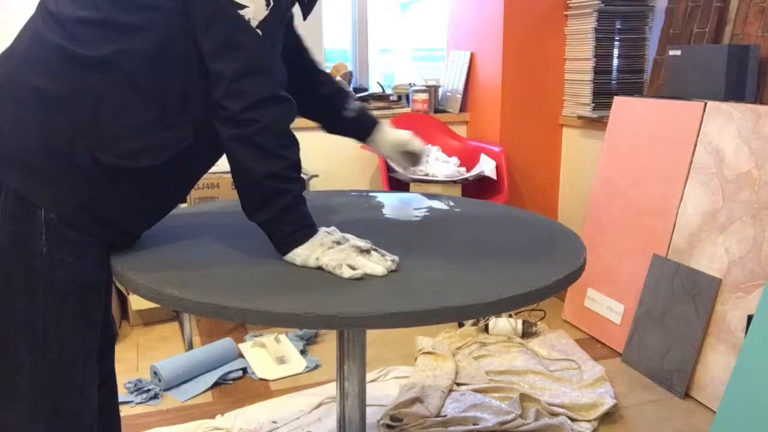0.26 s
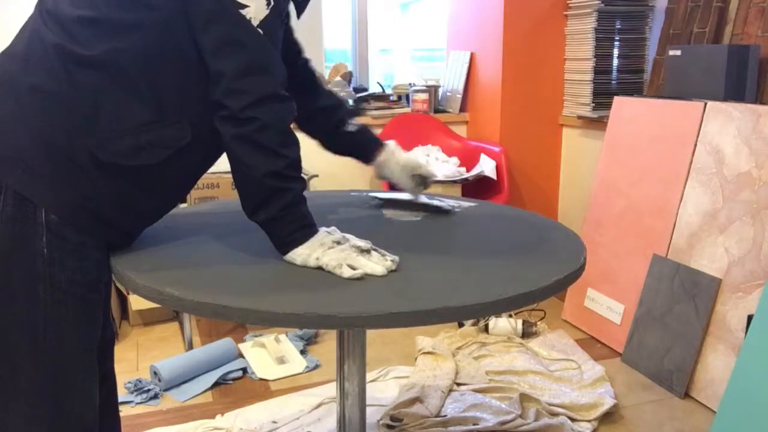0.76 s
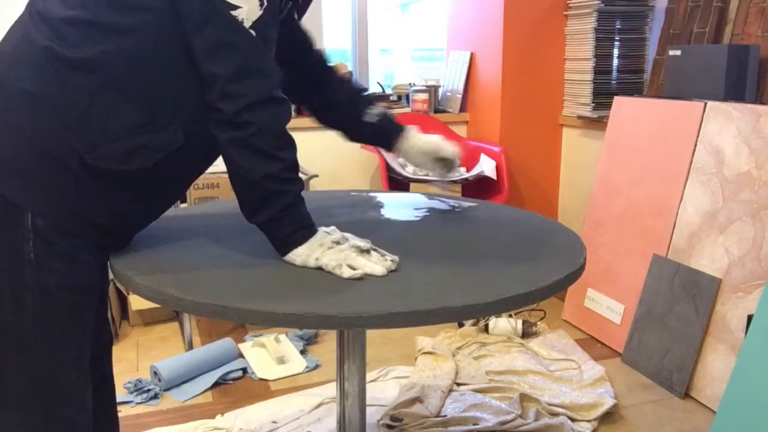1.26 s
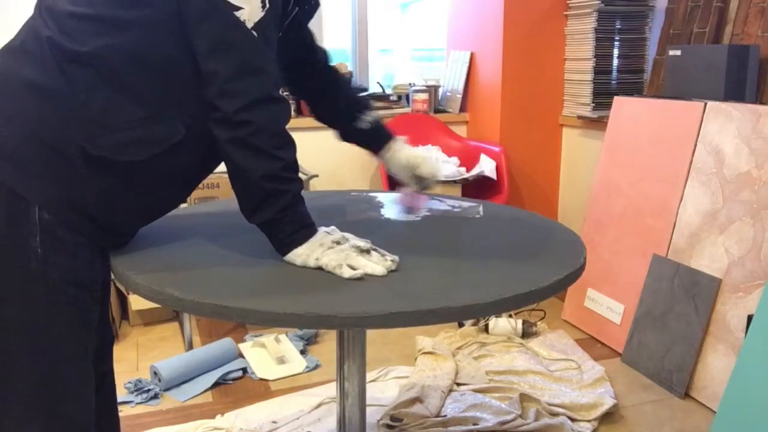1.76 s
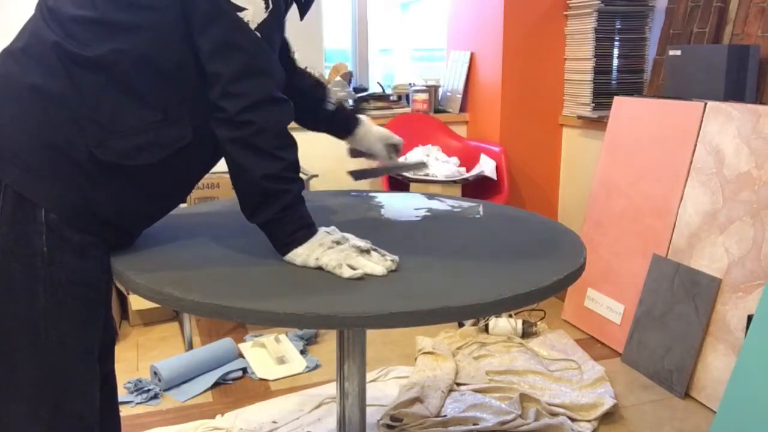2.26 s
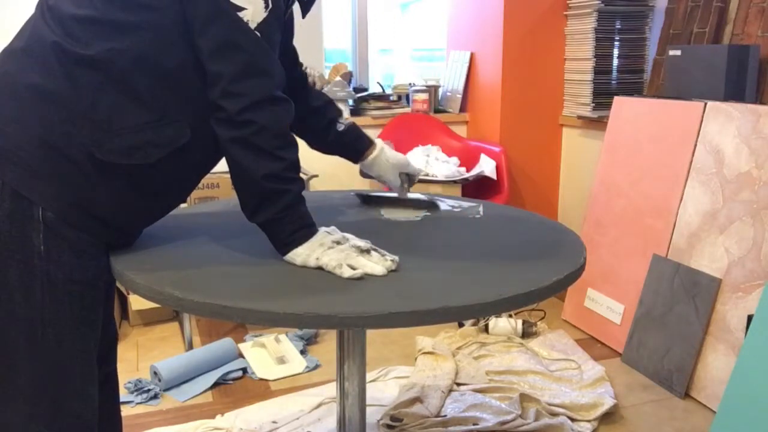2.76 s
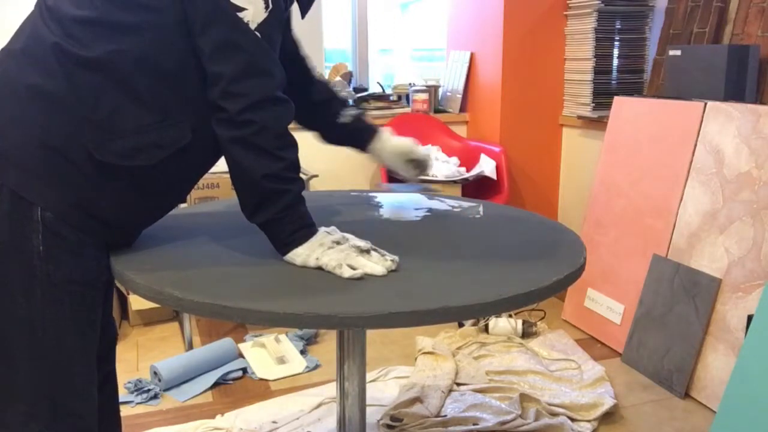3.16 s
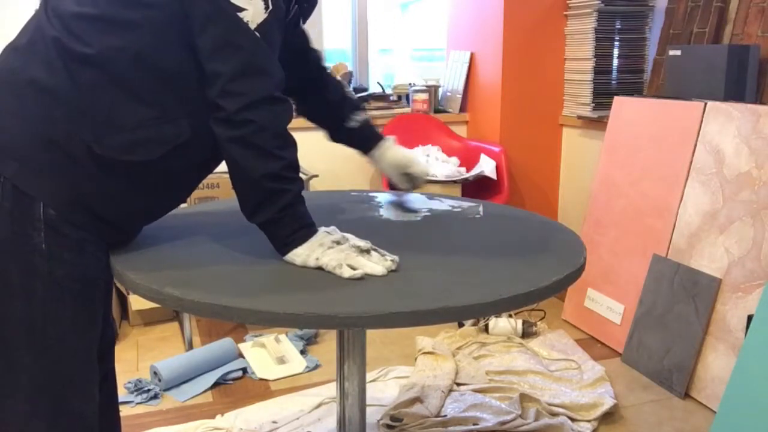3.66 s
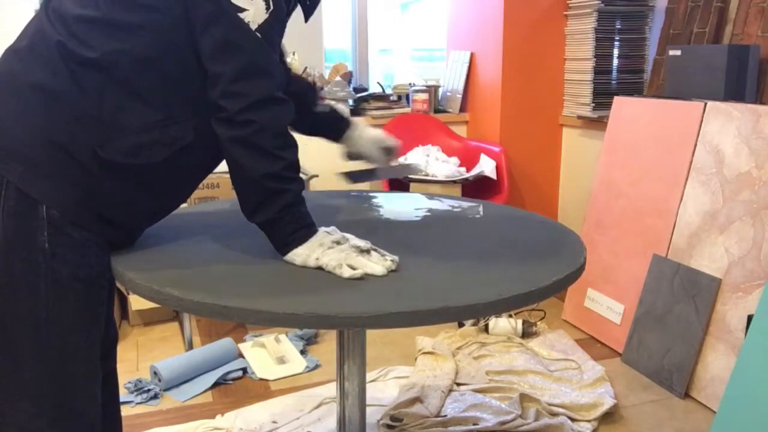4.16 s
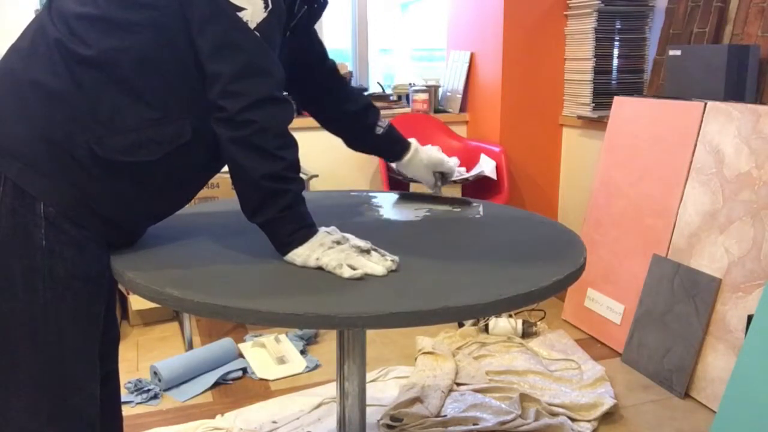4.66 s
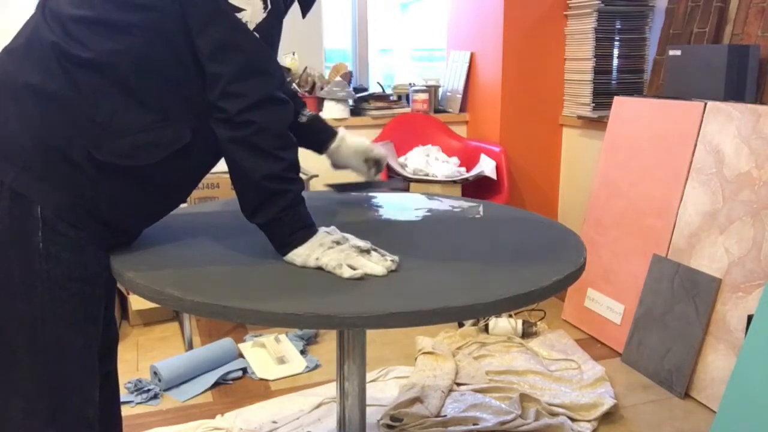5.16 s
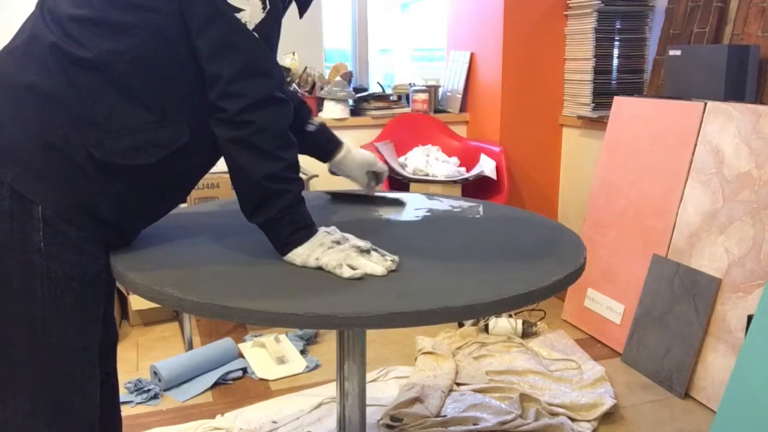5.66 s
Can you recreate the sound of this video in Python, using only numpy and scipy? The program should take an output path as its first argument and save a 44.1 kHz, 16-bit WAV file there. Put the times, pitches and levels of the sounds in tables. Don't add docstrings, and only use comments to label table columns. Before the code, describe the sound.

After a sliver of silence, the end of a gritty metal scrape is heard and cuts off by about 0.15 s. A steel blade then strokes a rough hard tabletop about once a second, landing near 0.6, 1.6, 2.6, 3.5, 4.5 and 5.5 s. Each landing is a quick clatter of corner clicks and short skids, heaviest in the last two strokes. A dense, bright rasp follows for about half a second, swelling unevenly, with a bending metallic resonance and a hollow low boom from the table. It lifts off abruptly. In the gaps a thin ring lingers, clearest around 1.2 s and steady around 2.3 to 2.5 s, with a short room tail, faint hiss and low hum. Soft puffs of moved air accompany several strokes, and a foot shifts very faintly near 1.4 s. The last scrape is cut off mid-stroke, near 5.9 s.

```python
import sys
import numpy as np
from scipy import signal
from scipy.fft import rfft, irfft
from scipy.io import wavfile

SR = 44100
rng = np.random.default_rng(int(sys.argv[2]) if len(sys.argv) > 2 else 0)


def level_to_linear(level):
    exponent = np.asarray(level, float) / 20
    return 10 ** exponent


def output_pcm(signal):
    pcm = np.clip(np.atleast_2d(signal).T, -1, 1) * 32767
    wavfile.write(sys.argv[1], SR, np.round(pcm).astype(np.int16))


N = 259749

# frequency in Hz, level in dB per Hz.
FLOOR_COLOUR = [(19, -36.5), (32, -13.5), (133, -13), (255, -23), (290, -24.5), (615, -28), (700, -30),
                (907, -30.5), (1370, -28), (1480, -28), (1600, -28.5), (6020, -36.5), (15700, -53)]
# frequency in Hz, level in dB rms.
HUM = [(44.5, -76.5), (119, -69), (238, -97)]
# time in seconds, level in dB.
HISS_AFTER = [(.25, -57.5), (1.3, -57.5), (2.3, -59), (3.3, -60), (4.2, -59), (5.3, -61)]
GATES = [.497, 2.497, 4.432, 5.461]
HISS_SAG_DB_PER_S, GATE_DB = 14.5, -4.5

# frequency in Hz, t60 in seconds.
ROOM_DECAY = [(300, 0.71), (1000, 0.4), (3000, 0.4), (6000, 0.36), (10000, 0.32), (15000, 0.2)]
ROOM_DB = -7.5

# time in seconds, peak in dB, pitch in Hz, length in seconds.
PUFFS = [(.72, -56.5, 42, .12), (1.677, -51, 43, 0.12), (2.655, -50, 45.3, 0.12), (3.603, -59, 43, 0.16),
         (3.929, -60, 43.4, .14), (.67, -55, 150, 0.087), (2.62, -51.5, 152.5, 0.08)]
# time in seconds, peak in dB, pitch in Hz, length in seconds.
STEPS = [
    (1.36, -56, 500, 0.036),
    (1.374, -61, 327, 0.041),
]

# lift in seconds, landing in seconds, level in dB rms,
# t60 in seconds, lower mode in dB relative to the upper.
RINGS = [
    (.15, 0.612, -71, 2.2, -1),
    (1.137, 1.575, -51, 0.71, -25),
    (2.263, 2.574, -54.5, 8.2, -28),
    (3.141, 3.495, -80, 3, -17),
    (4.23, 4.543, -61, 1.05, -11),
    (5.22, 5.493, -61, 2.1, -22),
]
RING_HZ = 1464, 834
RING_DB = 5.5

# frequency in Hz, width in Hz, level in dB.
TABLETOP = [(315, 23.6, -1), (342, 17, 3.5), (363, 15, -5), (384, 9.2, -6.5), (498, 48, -5), (562, 21, -2),
            (664, 31, -5), (724, 33, -4.5)]
# time in seconds, level in dB, favoured pitch in Hz.
HOLLOWS = [(.1, 12, 333), (.66, 1, 340), (.96, 13, 335), (1.2, -8, 340), (1.69, 4.5, 330), (1.8, 2, 334),
           (1.95, 2.5, 345), (2.11, 5, 330), (2.63, 7, 330), (2.78, -3, 340), (2.95, 8.5, 340),
           (3.22, -9, 336), (3.68, 8.5, 320), (3.8, 0.5, 350), (3.93, -8.5, 320), (4.07, 11.5, 345),
           (4.57, 10, 315), (4.72, 6, 328), (4.84, -7, 320), (4.9, 7, 360), (5.03, 8, 367), (5.17, 14, 374),
           (5.62, 6.5, 310), (5.82, 11, 376)]
HOLLOW_S, HOLLOW_WIDTH_HZ = 0.07, 48
BOOM_DB, BOOM_FOLLOWS, BOOM_LIFT_DB_PER_S = -33, 0.37, 59

# frequency in Hz, level in dB per Hz.
SCRAPE_COLOUR = [(250, -65), (420, -30), (725, -15.5), (810, -18.5), (1090, -8), (1550, -8), (2500, -7.5),
                 (4600, -7.5), (4950, -14), (5500, -10.5), (9300, -20), (10400, -24.5), (11200, -22),
                 (16500, -23.5)]
# frequency in Hz, width in Hz, gain in dB over the colour.
BLADE = [(912.5, 44, 8.5), (1302, 244, 6), (1519, 44, 3.5), (1659, 30, 5.5), (1860, 130, 4.5),
         (2153, 250, 5), (2695, 410, 3.5), (3120, 180, 5.5), (3840, 160, 2), (4570, 200, 1),
         (6125, 410, -1), (6000, 490, 4), (9330, 510, 1.5)]
# frequency in Hz, width in Hz, level in dB.
LINGER = [(1003, 6.7, -1.5), (1277, 13, -4), (1498, 3.7, -2), (1611, 11, -3), (2306, 8.8, -4),
          (2774, 16, -5.5), (3236, 9.3, -10.5)]
# Hz at landing, Hz at lift, dB at landing, dB at lift.
BEND = [(1420, 1430, -11.5, 0), (1655, 1700, 6, 0.5), (1760, 1620, -5, -1), (1463, 1716, 3.5, -3),
        (1675, 1530, 4.5, -1), (1640, 1685, -1.5, 3), (1640, 1580, 4.5, 1)]
# time in seconds, frequency in Hz, level in dB.
UNBEND = [(.1, 3130, 3), (1.62, 2800, 5), (2.85, 6220, 4.5), (4.8, 6130, 4), (1.11, 2300, 11.5),
          (3.05, 2360, 3), (3.07, 2910, 2), (4.05, 2950, 5), (5.09, 2900, 8.5)]
UNBEND_S, UNBEND_WIDTH_HZ = 0.051, 160
FLEX_DB, FLEX_WIDTH_HZ, WANDER_DB = 4.5, 202, 3.5

# time in seconds, peak in dB, top in dB relative, skid t60 in seconds.
LANDINGS = [(0.6154, -25, -13, 0.045), (0.6251, -21, -2, 0.017), (.6325, -21, -4, 0.0089),
            (.654, -20.5, -15, 0.044), (1.574, -37, -28, 0.079), (1.597, -23, -7, 0.083),
            (2.5694, -21, -4, 0.023), (2.575, -22, -5, .015), (2.581, -27, -18, 0.018),
            (3.4894, -31.5, -9.5, 0.084), (3.5224, -20.5, -1, 0.026), (4.541, -25.5, -20, 0.075),
            (4.6114, -15, -8, 0.038), (4.660, -12.5, -0.5, 0.016), (5.495, -31, -3, .06),
            (5.51, -24, -2, 0.014), (5.544, -17, -18, 0.015), (5.586, -20, -5, .008),
            (5.602, -14.5, -3, 0.013), (5.634, -19, 10, .008)]
# frequency in Hz, width in Hz, level in dB.
THUD = [(500, 55, -17.5), (594, 88, -19.5), (730, 57, -16.5)]

# time in seconds, level in dB.
PRESSURE = [
    [(0, -6.5), (.085, -23.5), (.125, -29)],
    [(.616, -36.5), (.63, -29.5), (.646, -49), (.66, -27), (.72, -24), (.95, -17), (1.06, -20), (1.11, -31)],
    [(1.575, -63), (1.607, -33.5), (1.645, -35.5), (1.693, -23), (1.77, -20.5), (1.92, -21.5), (1.99, -16),
     (2.095, -20)],
    [(2.57, -24), (2.614, -31), (2.67, -32), (2.69, -24.5), (2.74, -19), (2.85, -18), (3.05, -18.5)],
    [(3.49, -53), (3.556, -30), (3.61, -24.5), (3.66, -21.5), (3.82, -24.5), (3.892, -17), (3.99, -18.5),
     (4.05, -27)],
    [(4.541, -38.5), (4.605, -30.5), (4.632, -30), (4.645, -27), (4.75, -22), (4.825, -19), (4.86, -21),
     (5.045, -19.5), (5.085, -24)],
    [(5.494, -50), (5.512, -31), (5.53, -37), (5.56, -30), (5.666, -21), (5.76, -17.5), (5.81, -19),
     (5.89, -17.5)],
]
# time in seconds, level in dB.
SPEED = [
    [(0, -6), (.085, -4), (.125, -6.5)],
    [(.616, 3.5), (.66, -0.5), (.78, -0.5), (.92, 0), (1.06, -3.5)],
    [(1.575, -13), (1.69, -8), (1.92, -4), (1.98, -6.5), (2.05, -3.5)],
    [(2.57, -2.5), (2.59, -16.5), (2.625, 0), (2.76, -2), (2.85, -0.5), (2.96, -3), (3.05, -9)],
    [(3.49, -4), (3.62, -3.5), (3.8, 0), (3.89, -4), (4.04, -3.5)],
    [(4.541, 0.5), (4.63, -5), (4.7, 2), (4.8, -1), (4.86, -1), (5.06, -5.5)],
    [(5.494, 0), (5.522, -18), (5.535, -3), (5.66, -1.5), (5.89, -3.5)],
]
WIPE_DB = [7, -1.5, 5, 4, 3.5, 12, 7]
LIFT_DB_PER_S, LIFT_DULLS_DB_PER_S, LIFT_S = 335, 79, 0.16
MID_DB, MID_FOLLOWS, MID_AT_LIFT_DB = -3, 0.4, 2.5

START_S = 0.0765
CUTOFF_HZ = 16150


def unit(x):
    return x / np.sqrt(np.mean(x ** 2) + 1e-20)


def at_hz(points, hz):
    table_hz, table_db = np.array(points).T
    return np.interp(np.log(hz), np.log(table_hz), table_db)


def drift(rate):
    r = np.exp(-80 * np.pi * rate / SR)
    noise = rng.standard_normal(N // 40 + 2002)
    slow = signal.lfilter([1], [1, -2 * r, r * r], noise)[2000:]
    return np.interp(np.arange(N) / 40, np.arange(len(slow)), unit(slow))


def two_pole(hz, width_hz):
    r = np.exp(-np.pi * width_hz / SR)
    return np.array([1, 0, -1]) * (1 - r * r) / 2, [1, -2 * r * np.cos(2 * np.pi * hz / SR), r * r]


def resonate(x, hz, width_hz):
    b, a = two_pole(hz, width_hz)
    return signal.lfilter(b, a, x)


def bands(x, centres_hz):
    spectrum = rfft(x)
    log_hz = np.log(np.arange(len(x) // 2 + 1) * SR / len(x) + 1)
    for share in np.eye(len(centres_hz)):
        yield irfft(spectrum * np.interp(log_hz, np.log(centres_hz), share), len(x))


def colour(x, points):
    cepstrum = irfft(np.log(level_to_linear(at_hz(points, np.arange(2049) * SR / 4096 + 1))))
    cepstrum[1:2048] *= 2
    cepstrum[2049:] = 0
    return signal.fftconvolve(x, irfft(np.exp(rfft(cepstrum))))[:len(x)]


def hiss_db(t):
    out = np.full(N, HISS_AFTER[0][1], float)
    for s, db in HISS_AFTER:
        after = t >= s - 0.15
        out[after] = (db - HISS_SAG_DB_PER_S * np.clip(t - s, 0, 0.3))[after]
    for s in GATES:
        out += GATE_DB * np.clip((t - s) / 0.0083 + 0.5, 0, 1) * (t < s + 0.2)
    return out


def background():
    t = np.arange(N) / SR
    rumble, hiss = bands(colour(rng.standard_normal(N), FLOOR_COLOUR), [180, 280])
    hum = 0
    for hz, db in HUM:
        level = level_to_linear(db + 6 + 1.3 * drift(4.0))
        hum = hum + level * np.sin(2 * np.pi * hz * t + 0.4 * drift(3.0))
    return unit(rumble) * level_to_linear(-66) + unit(hiss) * level_to_linear(hiss_db(t)) + hum


def room(x, count):
    t, out = np.arange(SR) / SR, 0
    place = np.arange(N) / SR / 0.12
    for k in range(count):
        zones = bands(rng.standard_normal(SR), np.array(ROOM_DECAY)[:, 0])
        tail = sum(zone * level_to_linear(-60 * t / t60) for zone, (hz, t60) in zip(zones, ROOM_DECAY))
        tail = tail * np.clip((t - 0.004) / 0.0046, 0, 1)
        here = np.sqrt(np.clip(1 - np.abs((place - k) % count - 1), 0, 1))
        out = out + signal.fftconvolve(x * here, tail / np.sqrt(np.sum(tail ** 2)))[:N]
    return out


def puffs():
    t, out = np.arange(N) / SR, np.zeros(N)
    for s, db, hz, length in PUFFS + STEPS:
        swell = np.exp(-((t - s) / length * 2) ** 2)
        out += level_to_linear(db) * swell * np.sin(2 * np.pi * hz * (t - s))
    return out


def ringing():
    t, out = np.arange(N) / SR, np.zeros(N)
    waver = 0.89 * drift(3.7)
    for lift, land, db, t60, low_db in RINGS:
        free = np.clip((t - lift) / 0.02, 0, 1) * np.clip((land - t) / 0.004 + 1, 0, 1)
        decay_db = -60 * (t - lift) / t60 * (free > 0)
        for hz, mode_db in zip(RING_HZ, (RING_DB, RING_DB + low_db)):
            out += free * level_to_linear(db + 3 + mode_db + waver + decay_db) * np.sin(2 * np.pi * hz * t)
    return out


def hollow(hz):
    t, total_db = np.arange(0, N, 64) / SR, 0
    for s, db, spot_hz in HOLLOWS:
        nearness = ((t - s) / HOLLOW_S) ** 2 + ((hz - spot_hz) / HOLLOW_WIDTH_HZ) ** 2
        total_db = total_db + db * np.exp(-nearness)
    return np.interp(np.arange(N) / SR, t, level_to_linear(total_db))


def tabletop(push):
    out = np.zeros(N)
    for hz, width, db in TABLETOP:
        drive = push * hollow(hz) * level_to_linear(2.7 * drift(6.3))
        out += level_to_linear(db) * resonate(resonate(drive, hz, width), hz, 2 * width)
    return out


def flex():
    points = []
    for rows, (land_hz, lift_hz, land_db, lift_db) in zip(PRESSURE, BEND):
        points += [(rows[0][0], land_hz, land_db), (rows[-1][0], lift_hz, lift_db)]
    return np.transpose(points)


def sweep(x, width_hz):
    out, state = np.empty(N), np.zeros(2)
    s, hz, db = flex()
    for i in range(0, N, 256):
        b, a = two_pole(np.interp(i / SR, s, hz), width_hz)
        out[i:i + 256], state = signal.lfilter(b, a, x[i:i + 256], zi=state)
    return out * level_to_linear(np.interp(np.arange(N) / SR, s, db))


def unbend(x):
    t, out = np.arange(N) / SR, np.zeros(N)
    for s, hz, db in UNBEND:
        swell = np.exp(-np.minimum(((t - s) / UNBEND_S) ** 2, 30))
        out += level_to_linear(db) * resonate(x * swell, hz, UNBEND_WIDTH_HZ)
    return out


def blade(ticks, mid, top, air=1):
    steel = colour(ticks, SCRAPE_COLOUR)
    out = steel
    for hz, width, db in BLADE:
        out = out + (level_to_linear(db) - 1) * level_to_linear(WANDER_DB * drift(8.0)) * resonate(steel, hz, width)
    out = out + level_to_linear(FLEX_DB) * sweep(out, FLEX_WIDTH_HZ) + unbend(out)
    thin = sum(level_to_linear(db) * resonate(out * level_to_linear(WANDER_DB * drift(4.3)), hz, width) for hz, width, db in LINGER)
    low_zone, mid_zone, top_zone, air_zone = bands(out + thin, [1940, 3230, 6450, 11000])
    return low_zone + mid * mid_zone + top * (top_zone + air * air_zone)


def landings():
    t, knock, bright = np.arange(SR // 8) / SR, np.zeros(N), np.ones(N)
    fizz = rng.standard_normal(N)
    for s, db, top_db, t60 in LANDINGS:
        i = round(s * SR)
        skid = level_to_linear(-60 * t / max(t60, 0.005))
        knock[i:i + len(skid)] += level_to_linear(db) * skid * fizz[i:i + len(skid)]
        knock[i] += level_to_linear(db + 13.5)
        bright[i - 40:] = level_to_linear(top_db + 7)
    thud = sum(level_to_linear(db + 15.5) * resonate(knock, hz, width) for hz, width, db in THUD)
    return thud + blade(knock, level_to_linear(3), bright)


def hand():
    t, out = np.arange(N) / SR, np.zeros((5, N))
    for rows, speeds, wipe_db in zip(PRESSURE, SPEED, WIPE_DB):
        land, lift = rows[0][0], rows[-1][0]
        lifted = np.maximum(t - lift, 0)
        press = np.interp(t, *np.transpose(rows)) - LIFT_DB_PER_S * lifted
        speed = np.interp(t, *np.transpose(speeds))
        mid = MID_DB + MID_FOLLOWS * speed + MID_AT_LIFT_DB * np.clip(1 + (t - lift) / 0.15, 0, 1)
        top = speed - LIFT_DULLS_DB_PER_S * lifted
        table = BOOM_DB - (1 - BOOM_FOLLOWS) * (press + 20) - BOOM_LIFT_DB_PER_S * lifted
        air = np.interp(t, [land, lift], [-wipe_db / 2, wipe_db / 2])
        down = (t >= land) & (lifted < LIFT_S)
        out[:, down] = level_to_linear([press, mid, top, np.minimum(table, -3), air])[:, down]
    return out


def grit(per_s, spread_db):
    sizes = level_to_linear(spread_db * np.minimum(rng.exponential(1, N), 5)) * rng.choice([-1, 1], N)
    return unit(sizes * (rng.random(N) < per_s / SR)) + 1e-9 * rng.standard_normal(N)


def scrape():
    pressure, mid, top, table, air = hand()
    ticks = grit(per_s=9000, spread_db=1.5) * level_to_linear(0.92 * drift(35.0))
    drag = blade(ticks * pressure, mid, top * level_to_linear(6.5), air)
    boom = tabletop(ticks * pressure * table)
    return level_to_linear(10) * drag, level_to_linear(28.5) * boom


def scene():
    drag, boom = scrape()
    edge = drag + landings()
    echoes = level_to_linear(ROOM_DB) * room(edge + 0.24 * boom, count=6)
    mix = background() + echoes + puffs() + ringing() + boom + edge
    return np.tile(mix, (2, 1))


def band_limit(x):
    return signal.sosfilt(signal.butter(12, 16940, fs=SR, output="sos"), x)


def record(dry):
    x = 1.106 * np.tanh(dry / 1.169) * (np.arange(N) >= START_S * SR)
    x = signal.sosfilt(signal.butter(6, 37, "high", fs=SR, output="sos"), x)
    x = signal.sosfilt(signal.cheby2(18, 60, CUTOFF_HZ, fs=SR, output="sos"), x)
    return band_limit(x)


dry = scene()
out = record(dry)
output_pcm(out)
```